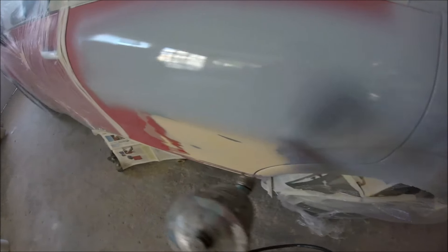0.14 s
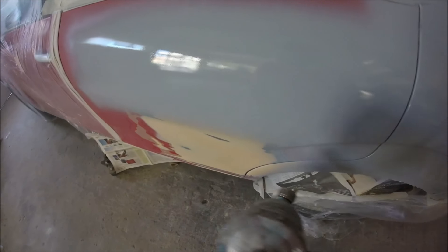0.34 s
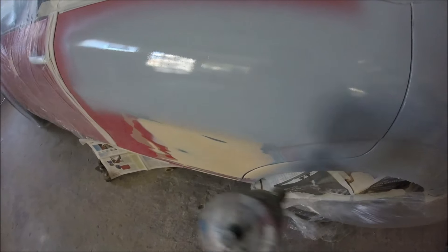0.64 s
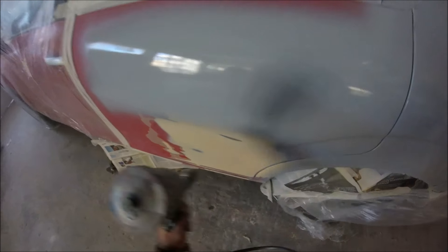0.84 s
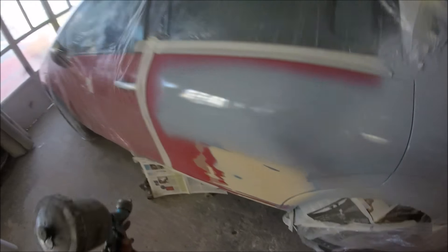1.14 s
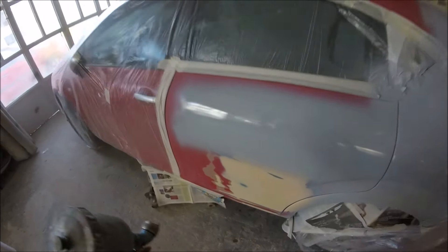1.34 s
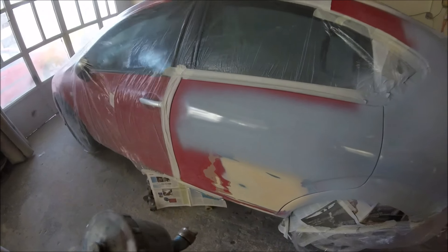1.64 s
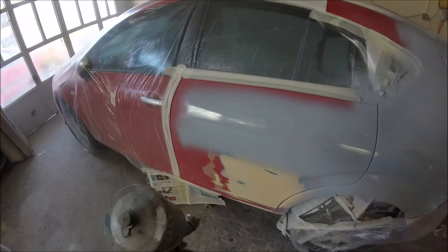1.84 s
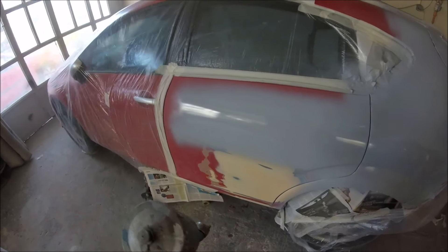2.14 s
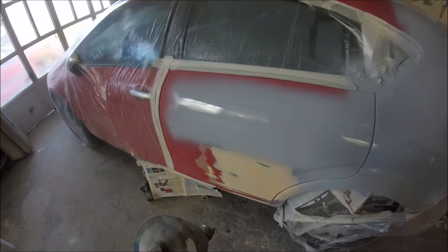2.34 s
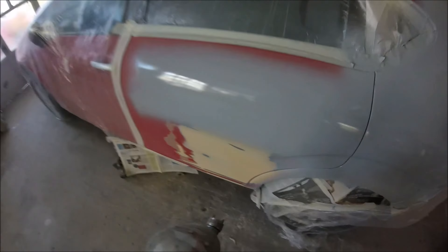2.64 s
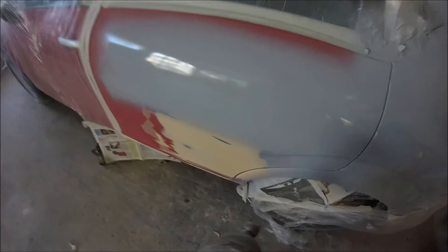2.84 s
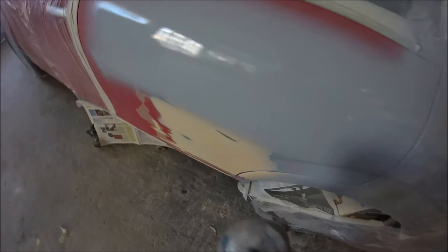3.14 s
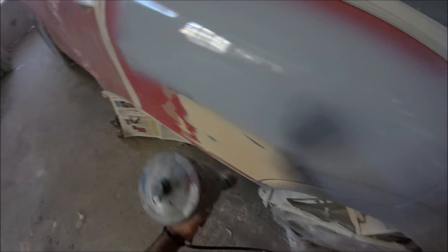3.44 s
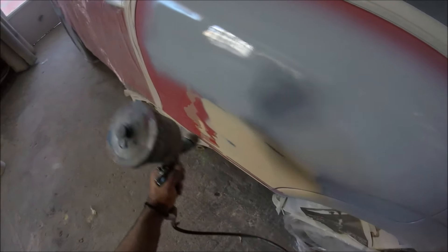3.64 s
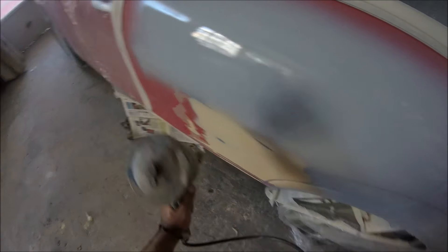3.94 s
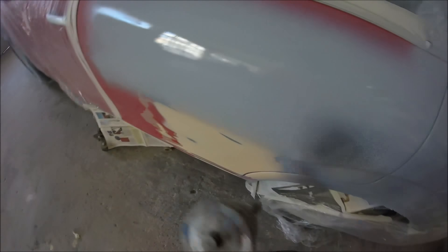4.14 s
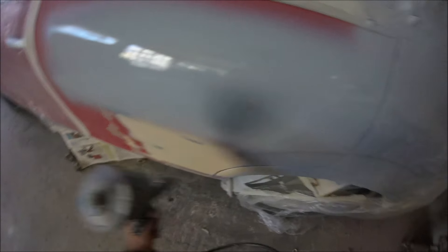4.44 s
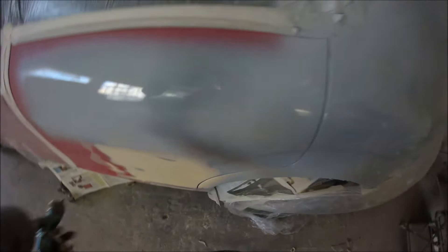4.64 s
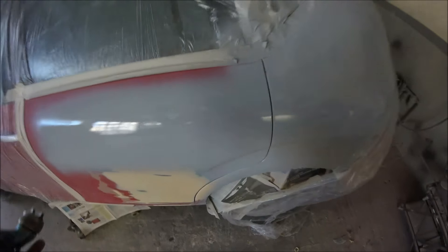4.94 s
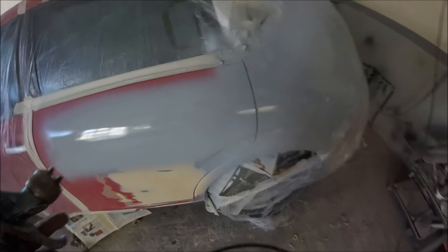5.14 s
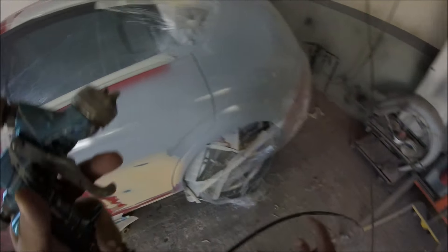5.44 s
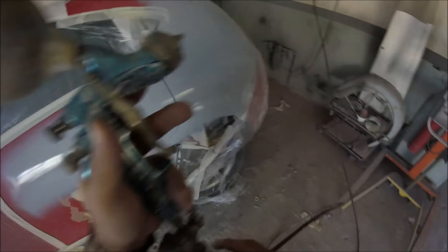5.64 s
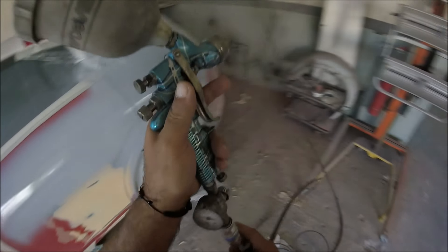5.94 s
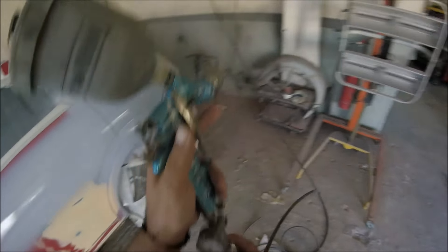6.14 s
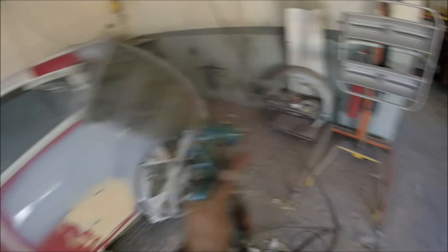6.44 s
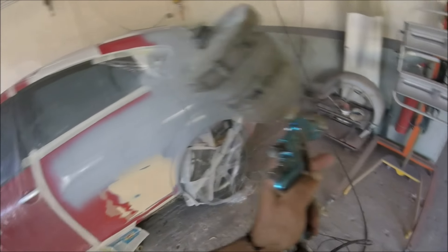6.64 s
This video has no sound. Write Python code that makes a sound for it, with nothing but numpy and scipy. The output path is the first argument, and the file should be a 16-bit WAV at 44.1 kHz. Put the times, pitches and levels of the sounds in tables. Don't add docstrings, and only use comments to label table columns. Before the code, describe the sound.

Continuous compressed-air hiss from a paint sprayer close to the microphone, growing louder late, then easing, with a soft low thump and machine drone underneath.

```python
import sys
import numpy as np
from scipy import signal
from scipy.fft import rfft, irfft
from scipy.io import wavfile
from scipy.ndimage import uniform_filter1d, map_coordinates

SR = 44100
rng = np.random.default_rng(int(sys.argv[2]) if len(sys.argv) > 2 else 0)


def wav_record(signal):
    frames = np.transpose(np.atleast_2d(signal))
    bounded = np.clip(frames, -1, 1)
    quanta = np.round(bounded * 32767).astype(np.int16)
    wavfile.write(sys.argv[1], SR, quanta)


def amplitude_ratio(level_db):
    exponent = np.asarray(level_db, float) / 20
    return 10 ** exponent


N = 298998
BLOCK = 2048


def rms_one(x):
    return x / np.sqrt(np.mean(x ** 2) + 1e-20)


def in_time(rows):
    time_s, value = np.transpose(rows)
    return np.interp(np.arange(N) / SR, time_s, value)


def drift(rate_hz):
    step = 40
    r = np.exp(-2 * step * np.pi * rate_hz / SR)
    noise = rng.standard_normal(N // step + 2002)
    slow = signal.lfilter([1], [1, -2 * r, r * r], noise)[2000:]
    return np.interp(np.arange(N) / step, np.arange(len(slow)), rms_one(slow))


def resonate(x, hz, width_hz):
    r = np.exp(-np.pi * width_hz / SR)
    zeros = np.array([1, 0, -1]) * (1 - r * r) / 2
    return signal.lfilter(zeros, [1, -2 * r * np.cos(2 * np.pi * hz / SR), r * r], x)


def wrist_flicks_db(hz):
    # (start [s], length [s], lobe centre [Hz], gain [dB])
    flicks = [(0, .12, 14000, -2), (0.213, .3, 3620, 2), (0.672, 0.51, 1200, 5), (1.0, 0.21, 12500, -2.5),
              (1.105, .45, 4230, 1.5), (1.28, 0.32, 11000, 2), (1.6, 1.06, 14100, -0.5),
              (2.837, 0.29, 11200, 2), (3.172, 0.21, 1200, 6.5), (3.368, 0.27, 1450, 2.5),
              (3.397, 0.31, 12900, 2), (4.077, 0.18, 8900, 1), (4.1, 0.47, 3500, 0),
              (4.36, 0.39, 1170, 4.5), (4.57, 0.13, 12000, 0), (4.775, 0.14, 11100, 4),
              (4.84, 0.46, 4250, 2), (5.05, 0.52, 1190, 1), (5.5, 0.26, 9600, 2), (6.197, 0.24, 8000, 0),
              (6.446, .4, 3000, 1.5), (.55, 0.38, 9800, -1), (2.875, 0.25, 5900, 1.5),
              (4.648, 0.68, 13500, 1.5), (5.3, .3, 4000, 2), (5.352, 0.63, 2200, -0.5),
              (5.693, 0.28, 4800, 1.5), (6.4, .4, 8700, -1)]
    edge_s, lobe_octaves = 0.04, 0.52
    start_s, length_s, lobe_hz, flick_db = np.transpose(flicks)[:, :, None]
    coarse = np.arange(0, N + 64, 64)
    inside_s = np.minimum(coarse / SR - start_s, start_s + length_s - coarse / SR)
    swings_db = flick_db * np.clip(inside_s / edge_s + 0.5, 0, 1)
    lobes = np.exp(-(np.log2(hz / lobe_hz) / lobe_octaves) ** 2)
    return np.interp(np.arange(N), coarse, np.sum(lobes * swings_db, axis=0))


def jet(flutter_db, wander_db, skirt_db):
    # (time [s], core level [dB])
    nearness = [(0.0, -35.5), (0.24, -35.5), (0.73, -37), (0.85, -34.5), (1.07, -40.5), (1.49, -40),
                (1.66, -41), (3.38, -38.5), (3.66, -36.5), (3.81, -40), (4.51, -37), (4.63, -41.5),
                (5.21, -33.5), (5.34, -33), (5.67, -27.5), (5.93, -35.5), (6.32, -35.5), (6.78, -39)]
    # (time [s], share [-1..1])
    aim = [(0, -0.48), (.95, -0.28), (1.15, .15), (2.8, -0.081), (4.5, -0.15), (4.75, 0.57), (5.05, 0.58),
           (5.4, 0.54), (5.7, 0.42), (6.0, 0.41), (6.35, 0.095), (6.78, -0.083)]
    # (centre [Hz], width [Hz], level [dB], change when the jet faces the port [dB])
    housing = [(1114, 82, -8.5, -5.5), (1306, 180, -9, -3), (1661, 210, -5, 1), (1880, 260, -10, -3),
               (2300, 320, -4, 1.5), (2552, 250, -4.5, -1.5), (2809, 157, -0.5, 1.7), (3405, 390, -1, -1.5),
               (3782, 202, -2.5, 4.5), (4244, 300, -5, 6.5), (4600, 254, -8.5, 5), (5300, 580, -13, 5),
               (5856, 390, -9.5, 6.5), (6450, 433, -1, 2.5), (6990, 260, -6.5, 3.5), (7674, 700, -1, -1),
               (8450, 660, -0.5, -0.8), (9260, 740, -0.5, -2), (10100, 180, -14, 11), (10800, 370, -6, 0.5),
               (11640, 210, -5, -0.5), (12220, 460, -8.5, 1), (13000, 630, -17, -3), (13500, 730, -20, -4),
               (14170, 740, -12, -6), (15200, 800, -14, -4)]
    zones_hz = (1500, 3300, 7800, 12500)
    zone_follows = (0.8, 0.64, 0.99, 0.99)

    core_db = uniform_filter1d(in_time(nearness), size=2400)
    facing = in_time(aim)
    zones_db = (np.array(zone_follows)[:, None] - 1) * (core_db - np.mean(core_db))
    out = np.zeros(N)
    for hz, width_hz, db, facing_db in housing:
        shares = np.array([np.interp(np.log(hz), np.log(zones_hz), row) for row in np.eye(4)])
        once = resonate(rng.standard_normal(N), hz, width_hz)
        peak = resonate(once, hz, 2 * width_hz) + amplitude_ratio(skirt_db) * once
        moved_db = facing_db * facing + shares @ zones_db + wrist_flicks_db(hz)
        out += amplitude_ratio(db + moved_db + wander_db * drift(0.62)) * peak
    port = signal.cheby1(6, 1, 1067, "high", fs=SR, output="sos")
    out = signal.sosfilt(port, out)
    core = signal.sosfilt(signal.butter(4, [5800, 10000], "band", fs=SR, output="sos"), out)
    rough_db = flutter_db * (drift(18) + 0.18 * drift(180))
    return out / np.std(core) * amplitude_ratio(core_db + rough_db)


def nearby_echoes(x, strength):
    # (start [s], end [s], delay at start [ms], delay at end [ms], share [-1..1])
    echoes = [(-0.16, 0.887, 0.14, 0.28, -0.028), (-0.16, 0.89, 0.55, 0.88, -0.056),
              (-0.16, 1.3, 0.41, 0.18, 0.055), (0.78, 1.83, 0.32, 0.17, 0.051),
              (0.99, 1.72, 0.54, 0.4, 0.056), (1.41, 2.904, 0.49, 0.57, 0.099),
              (3.597, 4.33, 0.38, 0.36, 0.059), (3.726, 4.75, 0.6, 0.37, -0.049),
              (3.807, 4.862, 0.245, 0.095, -0.063), (4.75, 5.48, 0.35, 0.43, -0.056),
              (4.75, 5.48, 0.71, 0.67, 0.1), (4.86, 5.9, 0.12, 0.22, 0.098),
              (4.958, 6.01, 0.23, 0.38, 0.09), (5.06, 6.11, 0.88, 0.66, 0.13),
              (5.17, 5.54, 0.45, 0.46, 0.1), (5.273, 6.01, 0.484, 0.57, -0.046),
              (5.27, 6.32, 1.08, 1.12, 0.058), (5.38, 6.84, 0.656, 0.914, -0.081),
              (5.48, 6.53, 0.65, 0.69, -0.065), (5.59, 6.108, 0.95, 0.87, -0.12),
              (5.577, 6.32, 0.95, 0.996, 0.15), (5.8, 6.53, 0.46, 0.47, -0.1),
              (6.01, 6.74, 0.46, 0.33, 0.031), (6.11, 6.48, 0.29, 0.28, 0.078)]
    fade_s = 0.048
    out = x.copy()
    for start_s, end_s, start_ms, end_ms, share in echoes:
        at = np.arange(max(int(start_s * SR), 0), min(int(end_s * SR), N))
        fade = np.clip(np.minimum(at / SR - start_s, end_s - at / SR) / fade_s, 0, 1)
        delay_ms = np.interp(at / SR, [start_s, end_s], [start_ms, end_ms])
        delayed = map_coordinates(x, [at - delay_ms * SR / 1000], order=3)
        out[at] += strength * share * fade * delayed
    return out


def thumps(rise_s):
    # (time of peak [s], peak level [dB], pitch [Hz])
    pushes = [
        (2.49, -69, 27.7),
        (2.74, -44, 39),
        (5.221, -40, 46),
    ]
    out = np.zeros(N)
    for peak_s, db, hz in pushes:
        t = np.maximum(np.arange(N) / SR - peak_s + rise_s, 0)
        swell = t / rise_s * np.exp(1 - t / rise_s)
        out += amplitude_ratio(db) * swell * np.sin(2 * np.pi * hz * t)
    return out


def shop(lumps_db):
    # (frequency [Hz], density [dB per Hz])
    spectrum = [(12, -29.5), (20, 4), (40, 1.5), (80, -3.5), (140, -8.5), (210, -9.5), (345, -14),
                (745, -19.5), (1000, -19.5), (1300, -52), (2200, -120)]
    # (centre [Hz], width [Hz], level [dB])
    drones = [(65, 11, -59), (100, 6, -62), (125, 9, -61.5), (158, 12, -67), (182, 9, -66)]
    # (time [s], gain of drones, hum and draught [dB])
    load = [
        (0, 1),
        (.6, 1.5),
        (1.2, .5),
        (2.0, -2),
        (3.0, 2.5),
        (4.4, 0),
        (4.95, 2),
        (5.5, -1.5),
        (6.2, -4.5),
        (6.78, -3),
    ]
    rumble_db, rumble_sway_db, draught_gust_db, drone_swell_db = -57, 0.6, 1.5, 1.5
    hum_hz, hum_db = 99.7, -62.5

    hz = np.maximum(np.fft.rfftfreq(N, 1 / SR), 1)
    points_hz, points_db = np.transpose(spectrum)
    shape_db = np.interp(np.log(hz), np.log(points_hz), points_db)
    lines = rfft(rng.standard_normal(N)) * amplitude_ratio(shape_db)
    lines /= np.std(irfft(lines * (hz > 150), N))
    deep = np.clip(2 - hz / 40, 0, 1)
    load_db = in_time(load)
    gusts_db = load_db + draught_gust_db * drift(1.2) + lumps_db * drift(2.1) - 1.0
    draught = amplitude_ratio(gusts_db) * irfft(lines * deep, N)
    rumble = irfft(lines * (1 - deep), N)
    out = amplitude_ratio(rumble_db + rumble_sway_db * drift(5.4)) * (rumble + draught)
    for drone_hz, width_hz, db in drones:
        once = resonate(rng.standard_normal(N + SR), drone_hz, width_hz)
        tone = rms_one(resonate(once, drone_hz, width_hz)[SR:])
        out += amplitude_ratio(db + load_db + drone_swell_db * drift(4)) * tone
    hum = np.sin(2 * np.pi * hum_hz * np.arange(N) / SR)
    return out + amplitude_ratio(hum_db + load_db + 1.5 + 0.8 * drift(1.5)) * hum


def scene():
    hiss = nearby_echoes(jet(flutter_db=0.29, wander_db=1.03, skirt_db=-16), strength=1.2)
    air = hiss + thumps(rise_s=0.03) + shop(lumps_db=-1.5)
    return np.array([air, air])


def block_at(centre_s):
    middle = round(centre_s * SR)
    return slice(middle - BLOCK // 2, middle + BLOCK // 2)


def starved(x):
    # (time [s], level over the neighbours that survives [dB])
    thin_blocks = [
        (.271, 5.5),
        (.441, 5.5),
        (4.942, 7),
        (5.027, 7),
    ]
    leak_db, survivor_db = -20, 2.5
    out, window = x.copy(), np.hanning(BLOCK) ** 2
    for centre_s, keep_db in thin_blocks:
        at = block_at(centre_s)
        lines = rfft(x[:, at] * window)
        around = uniform_filter1d(np.abs(lines), size=140)
        weak = np.abs(lines) < amplitude_ratio(keep_db) * around
        weak[:, :10] = False
        gain = amplitude_ratio(np.where(weak, leak_db, survivor_db))
        out[:, at] += irfft(lines * (gain - 1), BLOCK)
    return out


def channel_noise(x, apart_db, refilled_db):
    # (first centre [s], length [blocks])
    apart = [(1.0326, 6), (1.4738, 3), (1.6131, 2), (1.7756, 1), (2.0775, 1), (2.2633, 3), (2.3794, 2),
             (2.4955, 2), (2.6116, 1), (3.0527, 1), (3.1921, 3), (3.3082, 1), (3.4243, 1), (4.237, 2),
             (4.61, 3), (6.05, 2), (6.141, 2)]
    # (centre [s], low edge [Hz], high edge [Hz])
    refilled = [(.127, 4650, 5700), (.7075, 4650, 5700), (1.3577, 11700, 13050), (3.1456, 13050, 14450),
                (3.7958, 8250, 10300), (3.7958, 13800, 15200), (4.0512, 8250, 9650), (4.6781, 4150, 5150),
                (4.98, 4150, 5150), (4.98, 10300, 11700), (5.3051, 13050, 14450), (5.3283, 5150, 6300)]
    apart_share = 0.62
    side, window = np.zeros(N), signal.windows.kaiser_bessel_derived(BLOCK, 4 * np.pi)
    hz = np.fft.rfftfreq(BLOCK, 1 / SR)
    band = (6 * np.log2(1 + hz / 700)).astype(int)
    masks = []
    for first_s, blocks in apart:
        for centre_s in first_s + np.arange(blocks) * BLOCK / 2 / SR:
            chosen = (rng.random(40) < apart_share)[band]
            masks.append((centre_s, amplitude_ratio(apart_db) * chosen * (hz > 80)))
    for centre_s, low_hz, high_hz in refilled:
        masks.append((centre_s, amplitude_ratio(refilled_db) * (hz > low_hz) * (hz < high_hz)))
    for centre_s, mask in masks:
        at = block_at(centre_s)
        shape = uniform_filter1d(np.abs(rfft(x[0, at] * window)), size=8)
        phases = np.exp(2j * np.pi * rng.random(len(hz)))
        side[at] += window * irfft(shape * mask * phases, BLOCK)
    return x + side * [[1], [-1]]


def band_limit(x):
    return signal.sosfilt(signal.butter(12, 16460, fs=SR, output="sos"), x)


def record(dry):
    top_cut = signal.ellip(16, 0.5, 100, 15270, fs=SR, output="sos")
    cut = signal.sosfilt(top_cut, starved(dry))
    mix = channel_noise(cut, apart_db=-16.5, refilled_db=-0.5)
    return band_limit(mix)


dry = scene()
out = record(dry)
wav_record(out)
```